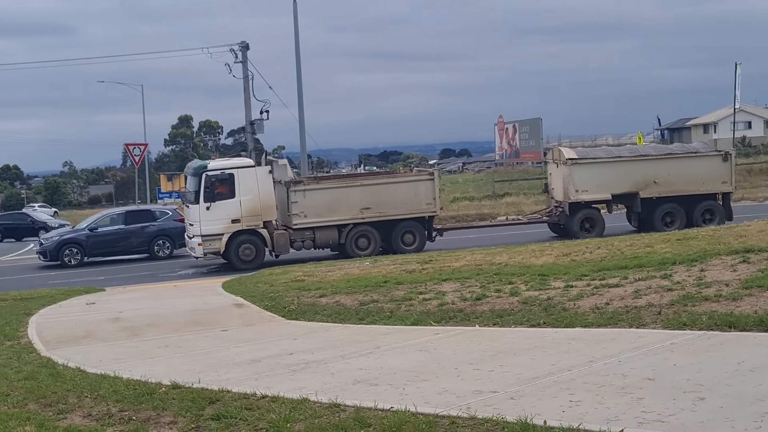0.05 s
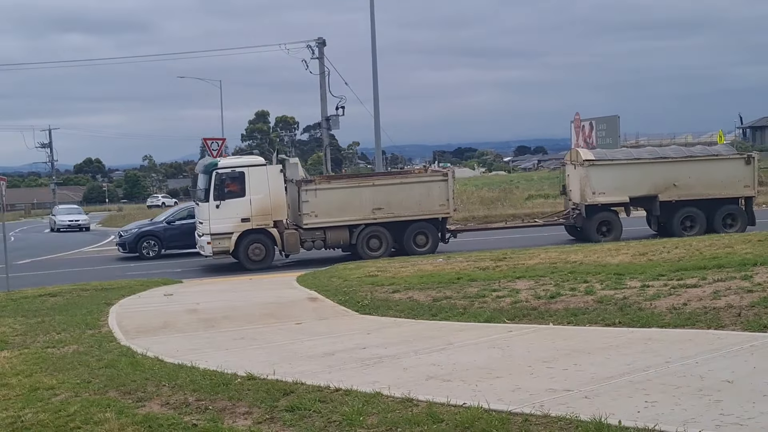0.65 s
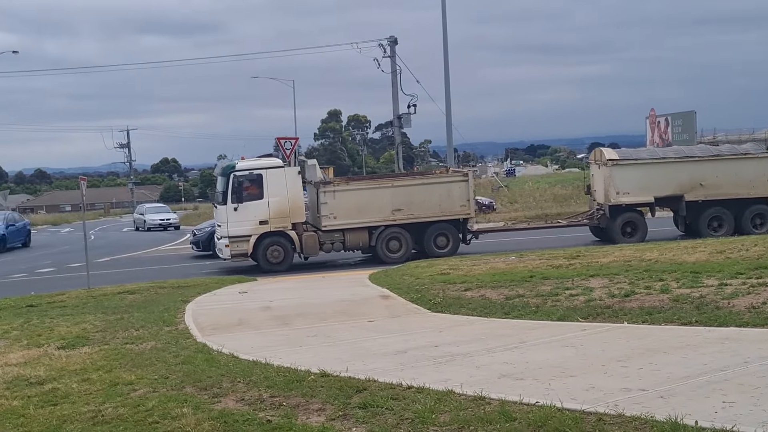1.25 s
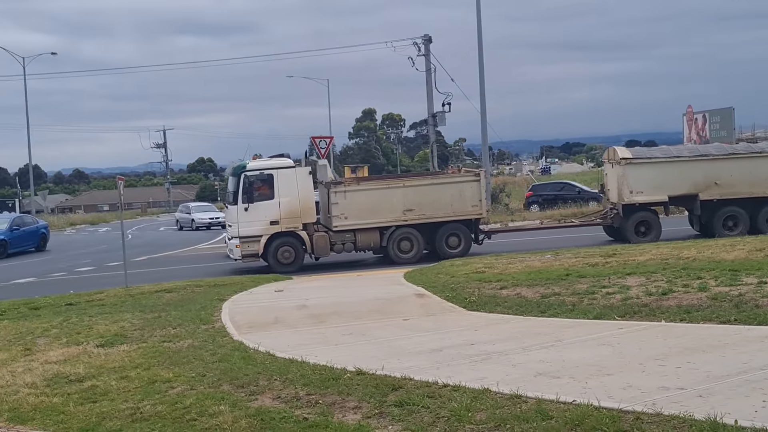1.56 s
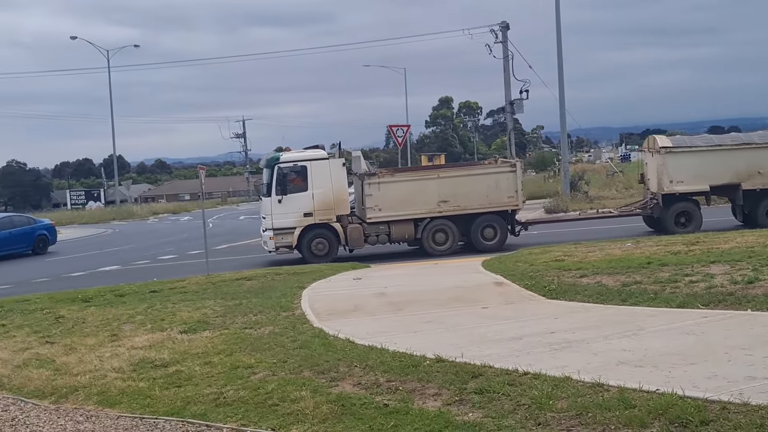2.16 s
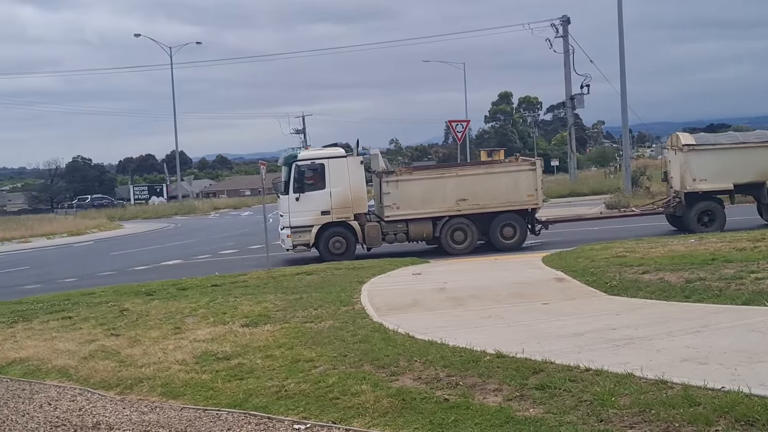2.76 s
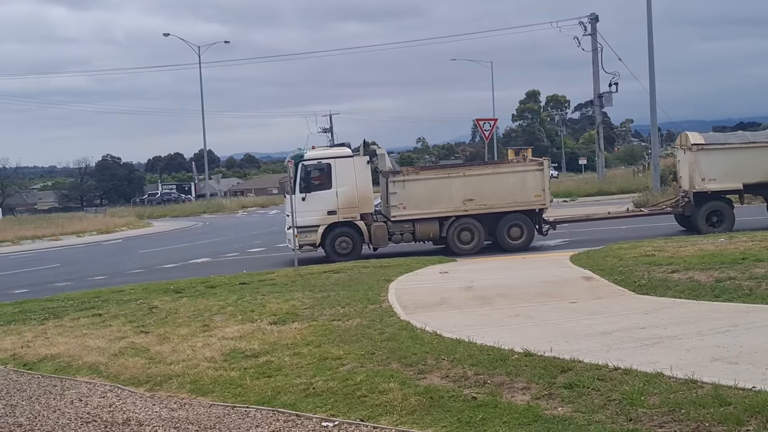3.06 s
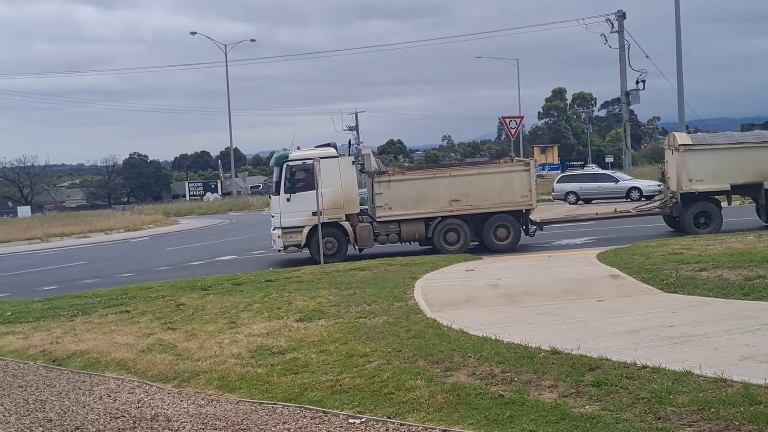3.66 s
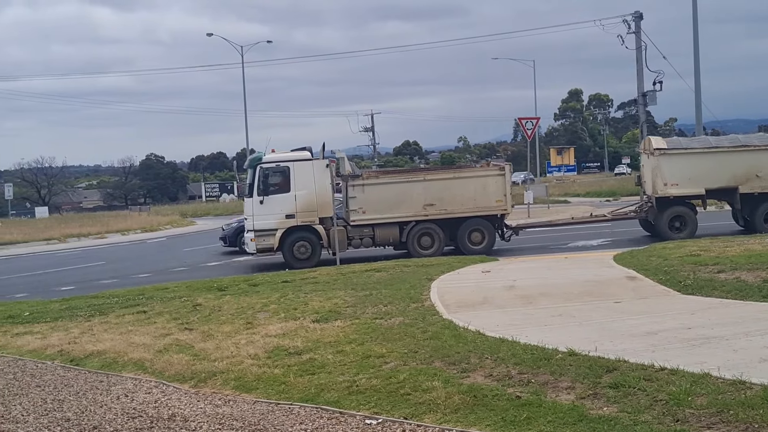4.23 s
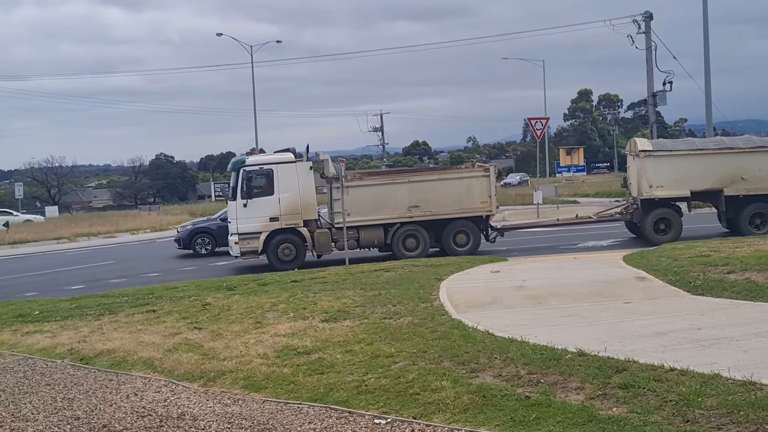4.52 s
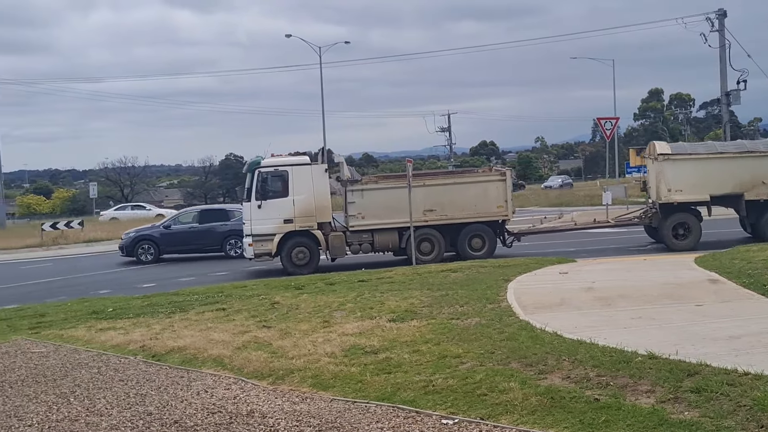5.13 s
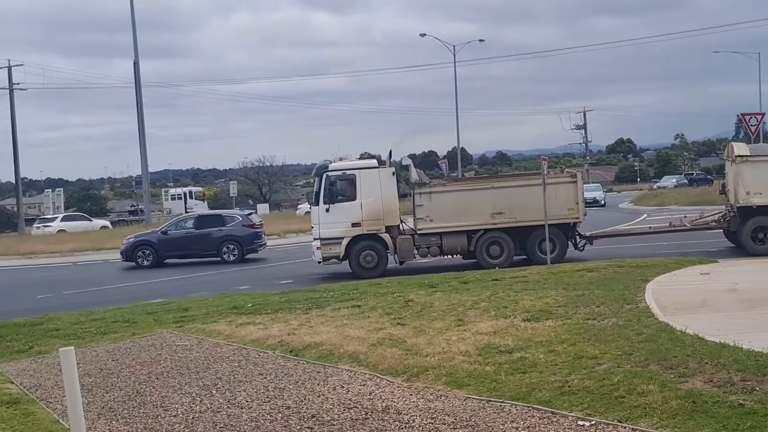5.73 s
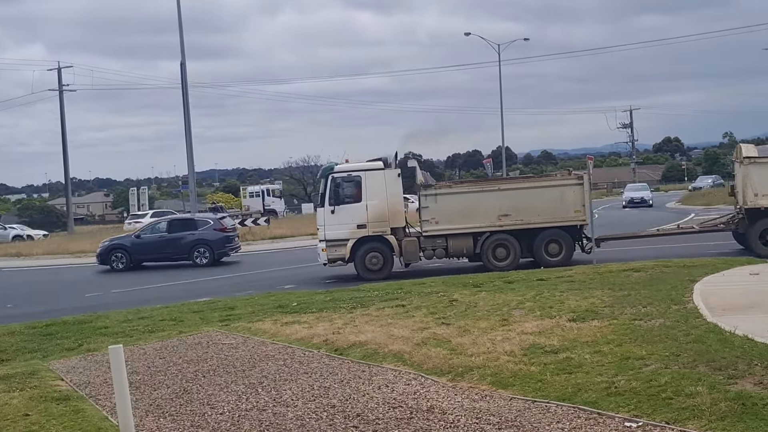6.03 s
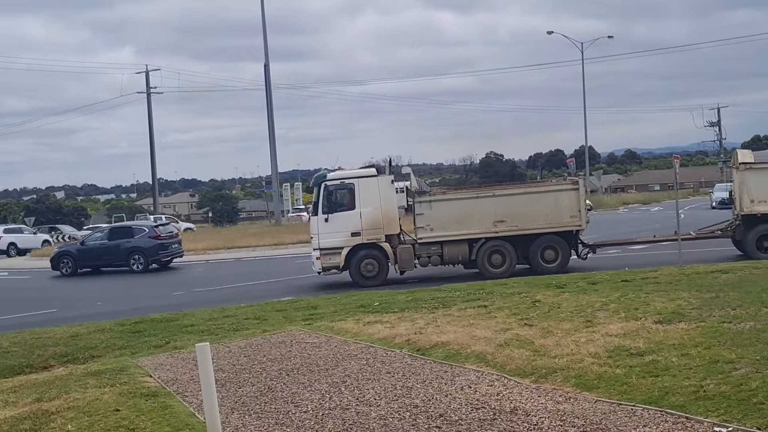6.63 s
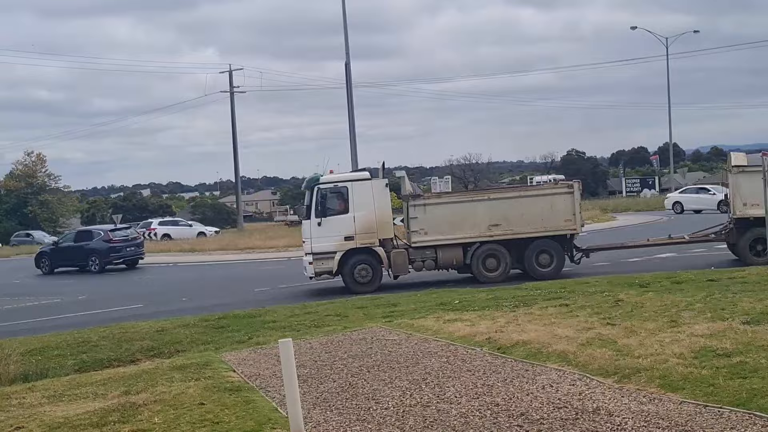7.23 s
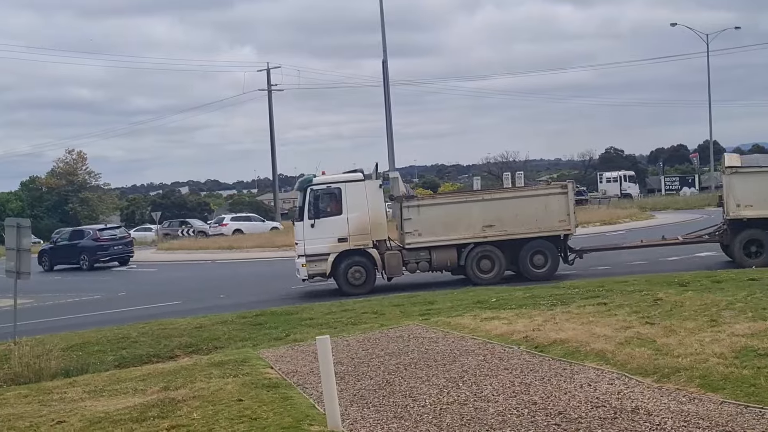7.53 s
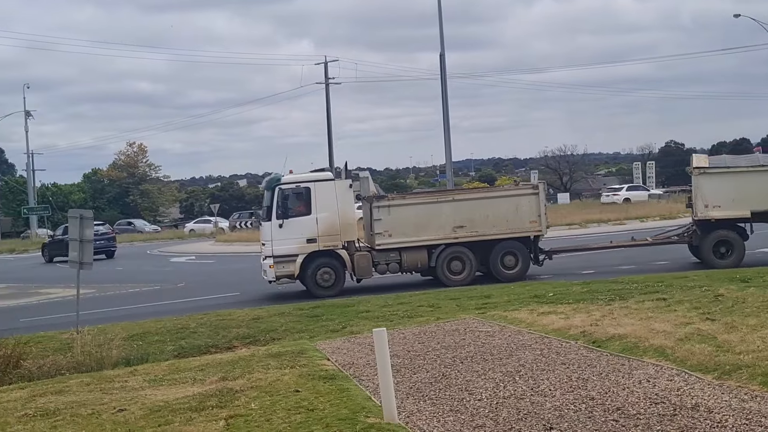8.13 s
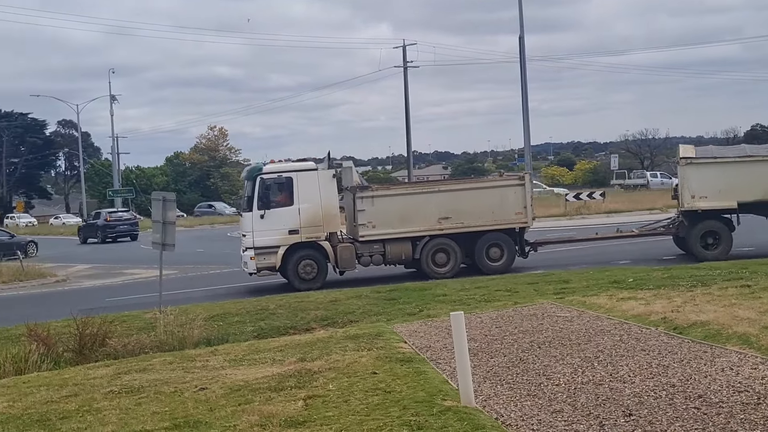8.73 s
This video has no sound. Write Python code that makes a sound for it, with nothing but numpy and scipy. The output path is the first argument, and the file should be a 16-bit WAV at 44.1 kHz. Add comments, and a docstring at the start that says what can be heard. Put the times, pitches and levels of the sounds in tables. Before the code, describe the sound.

Faint brake squeals and dull thumps come from a slow diesel tipper truck, which then accelerates with a deep, booming exhaust amid rumbling traffic.

```python
"""A six-cylinder diesel tipper with a trailer creeps up to a roundabout, blips the throttle, pulls away.
Its exhaust booms once per firing, while block clatter and rushing air grow with the load.
As it creeps, the brakes hiss and squeal faintly and dull jolts boom in the steel body.
Tyres rumble all around, another engine fades out at the start, and the right microphone port is muffled."""
import sys
import numpy as np
from scipy.fft import rfft, irfft, next_fast_len
from scipy.io import wavfile
from scipy.ndimage import uniform_filter1d, minimum_filter1d, map_coordinates

SR = 44100
rng = np.random.default_rng(int(sys.argv[2]) if len(sys.argv) > 2 else 0)


def dump_mix(stems):
    """Bounce the given channels to the path in sys.argv[1] as a 16-bit WAV at rate SR."""
    frames = np.atleast_2d(stems).T  # one column per channel
    limited = np.clip(frames, -1, 1)  # hard clip at full scale
    pcm = np.round(limited * 32767).astype(np.int16)
    wavfile.write(sys.argv[1], SR, pcm)


N = 396018
IDLE_HZ = 34.8  # firings per second at rest


def amp(db):
    """Decibels to gain."""
    return 10 ** (np.asarray(db) / 20)


def unit(x):
    """Scale to rms 1."""
    return x / np.sqrt(np.mean(x ** 2) + 1e-20)


def along(points, hz):
    """Read (freq_hz, value) points on a log frequency axis."""
    f, v = np.transpose(points)
    return np.interp(np.log(hz + 1), np.log(f + 1), v)


def curve(points):
    """An automation line through (time_s, value) points."""
    return np.interp(np.arange(N) / SR, *np.transpose(points))


def swell(start, end, rise, fall):
    """Rise, hold and fall between two times, 0-1."""
    t = np.arange(N) / SR
    return np.clip(np.minimum((t - start) / rise, (end - t) / fall), 0, 1)


def wobble(rate):
    """A smooth random curve, rate knots a second."""
    return map_coordinates(rng.standard_normal(int(N * rate / SR) + 4), [np.arange(N) * rate / SR])


def noise():
    """Fresh white noise."""
    return rng.standard_normal(N)


def filtered(x, response):
    """x through a complex frequency response."""
    m = next_fast_len(N + SR // 2)
    return irfft(rfft(x, m) * response(np.fft.rfftfreq(m, 1 / SR)), m)[..., :N]


def coloured(x, spectrum):
    """x through an EQ curve, at rms 1."""
    return unit(filtered(x, lambda hz: amp(along(spectrum, hz))))


def ringing(x, modes, drift):
    """x through steep resonances, at rms 1; drift scales their pitch."""
    def power(f):
        return sum(amp(2 * db) / (1 + ((f - hz) / (width / 2)) ** 2) ** 2 for hz, width, db in modes)
    now, warped = np.arange(N), np.cumsum(drift)
    # warp time, filter, warp back: the resonances bend while the rhythm stays put
    stretched = map_coordinates(x, [np.interp(now, warped, now)])
    ring = filtered(stretched, lambda f: np.sqrt(power(f)))
    return unit(map_coordinates(ring, [warped], mode="mirror"))


def bursts(firings, sharpness, uneven_db, scatter_db):
    """One swell per firing; each of the six cylinders has its own strength."""
    which = np.floor(firings).astype(int)
    cylinder_db = uneven_db * unit(rng.standard_normal(size=6))[which % 6]
    stroke_db = scatter_db * rng.standard_normal(size=2000)[which % 2000]
    return unit(amp(cylinder_db + stroke_db) * np.exp(-sharpness * np.cos(2 * np.pi * firings)))


def throttle(rate):
    """Air and knock grow with the revs and surge with each press: extra boom, air and knock, in dB."""
    # pedal presses: start_s, end_s, turbo_spool_s, rush_db, knock_db, extra_boom_db
    presses = [(3.295, 3.616, .1, -43.5, -46.5, 2.5), (3.857, 4.523, 0.15, -36, -37, 1.5),
               (4.995, 6.0, 0.75, -32, -35, 4.5), (6.156, 6.79, .21, -36.5, -39, 1.5),
               (7.925, 8.66, 0.32, -38, -33.5, 3), (8.491, 9.3, 0.17, -29.5, -31, 2)]
    pedal_s, release_s = 0.15, 0.15
    lunge_s = 1  # the extra boom fades as the truck picks up speed
    sag_db_per_s = 10.5  # rush and knock ease off once the turbo has spooled up
    t = np.arange(N) / SR
    push_db = np.zeros(N)
    rush = amp(-47.5 + 0.1612 * (rate - IDLE_HZ))
    knock = amp(-49 + 0.1163 * (rate - IDLE_HZ))
    for start, end, spool, rush_db, knock_db, boom_db in presses:
        lunge = np.exp(-np.maximum(t - start, 0) / lunge_s)
        push_db += boom_db * swell(start, end, pedal_s, release_s) * lunge
        sag = amp(-sag_db_per_s * np.maximum(t - start - spool, 0))
        surge = swell(start, end, spool, release_s) * sag
        rush = np.hypot(rush, amp(rush_db) * surge)
        knock = np.hypot(knock, amp(knock_db) * surge)
    return push_db, 20 * np.log10(rush), 20 * np.log10(knock)


def gearbox(push_db):
    """A gear loads the engine and the exhaust pulses harder: clutch 0-1, fundamental and upper dB."""
    # spells in gear: start_s, end_s, take_up_s, let_go_s, upper_harmonics_db
    gears = [(3.292, 3.655, 0.093, 0.033, -5.5), (3.747, 6.912, 0.13, 0.27, -0.5),
             (6.883, 9.3, .26, .2, -10.5)]
    clutch, upper = np.zeros(N), np.zeros(N)
    for start, end, take_up, let_go, upper_db in gears:
        grip = swell(start, end, take_up, let_go)
        clutch = np.maximum(clutch, grip)
        upper += amp(upper_db) * grip
    level = lambda load, idle_db: 20 * np.log10(np.hypot(load, amp(idle_db))) + push_db
    return clutch, level(clutch, idle_db=-21), level(upper, idle_db=-16.5)


def exhaust(firings, rate, first_db, upper_db, knock_db):
    """Each firing sends a pulse and a puff of gas down the pipe: boom, overtones and chug."""
    # tailpipe response that the first two harmonics sweep through: freq_hz, gain_db
    tailpipe = [(38, -16.5), (48, -11.5), (55, -14.5), (65, -8), (73, -11.5), (84, -9), (104, -12.5),
                (111, -15), (120, -25.5), (138, -30.5), (150, -19.5), (168, -17.5), (205, -27)]
    # harmonics 3 to 8 of the firing rate: gain_db
    overtone_db = [0.5, -1, -4.5, -15, -3.5, -10]
    # the silencer's colour on those overtones: freq_hz, gain_db
    silencer = [(120, -2), (172, 16), (220, -11), (290, 1.5), (420, -1), (500, 0), (600, -28)]
    # the pipe's colour on the chug: freq_hz, gain_db
    pipe = [(20, -19), (40, 13), (80, 7), (170, 10.5), (250, 5), (400, -10), (600, -20.5), (1500, -65)]
    # fader ride on the exhaust's turbulence: time_s, gain_db
    rumble = [(0, -40.5), (3.7, -44.5), (4.1, -38.5), (6.5, -40), (7.7, -41.5), (8.98, -46.5)]
    turn = 2 * np.pi * firings
    partial = lambda order: np.sin(order * turn + rng.uniform(0, 2 * np.pi))
    first = amp(first_db + along(tailpipe, rate) + 0.57 * wobble(10)) * np.sin(turn)
    second = amp(upper_db + along(tailpipe, 2 * rate) + 2.1 * wobble(16)) * np.cos(2 * turn)
    # load and hard combustion sharpen the pulses
    edge = np.hypot(amp(upper_db - 46), amp(knock_db - 10.5))
    overtones = sum(amp(db + along(silencer, k * rate) + 3 * wobble(24)) * partial(k)
                    for k, db in enumerate(overtone_db, start=3))
    # unequal cylinders add partials at sixths of the firing rate, and make the puffs chug
    sixth = lambda k: amp(along(pipe, k * rate / 6) + 2 * wobble(3)) * partial(k / 6)
    lope = unit(1.2 * sixth(3) + sum(sixth(k) for k in (5, 7, 8, 9, 10, 11)))
    gas = coloured(noise() * bursts(firings, sharpness=0.55, uneven_db=2, scatter_db=0.5), pipe)
    chug = amp(curve(rumble)) * (amp(9) * lope + amp(7.5) * gas)
    return first + second + edge * overtones + chug


def clatter(firings, knock_db, drift):
    """Combustion knocks ring the block; they stand out as the engine takes up the load."""
    # resonances of block and gearbox: pitch_hz, width_hz, gain_db
    block = [(803, 250, 0.5), (1080, 430, -1), (1398, 43, 3.5), (1547, 110, 0), (1973, 280, 3.5),
             (2275, 230, -2.5), (2776, 204, -0.5), (3033, 186, -0.5)]
    knocks = noise() * bursts(firings, sharpness=0.13, uneven_db=-0.8, scatter_db=1.0)
    return amp(knock_db) * ringing(knocks, block, drift)


def air(firings, rate, air_db, clutch, drift):
    """Mostly fan rush at idle; in gear the ducts howl, and their fizz grows with the revs."""
    # resonances of the intake and turbo ducts: pitch_hz, width_hz, gain_db
    ducts = [(3755, 600, 1), (3995, 113, 2), (4533, 390, 0.5), (4805, 99, 2), (5415, 490, -2.5),
             (5955, 135, -3.5), (6595, 590, -3.5), (7230, 225, -0.5), (7620, 410, -4.5), (8140, 550, -8)]
    # colour of the fan rush: freq_hz, gain_db
    fan_eq = [(700, -7.5), (2500, -6), (4300, 1), (5800, -7.5), (7200, -2), (8200, -8.5), (9000, -32.5)]
    # colour of the air's top hiss: freq_hz, gain_db
    fizz_eq = [(7000, -33), (9000, -2.5), (10300, -2.5), (11800, 2), (15500, -3.5)]
    rush = noise() * bursts(firings, sharpness=0.088, uneven_db=0.45, scatter_db=.5)
    boost = np.clip(clutch, 0.44, 1)  # some air rings the ducts even out of gear
    howl = boost * ringing(rush, ducts, drift)
    fan = np.sqrt(1 - boost ** 2) * coloured(noise(), fan_eq)
    fizz = amp(-19 + 0.044 * (rate - IDLE_HZ)) * coloured(rush, fizz_eq)
    return amp(air_db + 0.62 * wobble(8.3)) * (howl + fan + fizz)


def tyres():
    """Traffic rolling on the roundabout lays down a low, wavering bed."""
    # fader ride on the traffic: time_s, level_db
    ride = [(1.0, -30), (1.8, -32.5), (4.5, -31), (6.4, -30), (7.4, -36)]
    # colour of tyres on the road: freq_hz, gain_db
    road_eq = [(25, -16), (45, 8.5), (85, 21.5), (130, 10.5), (250, 1.5), (520, -6.5), (800, -1),
               (1400, -4), (2500, -10), (5000, -17), (8000, -28), (9000, -40)]
    return amp(curve(ride) + 0.69 * wobble(9.8)) * coloured(noise(), road_eq)


def other_engine():
    """Another engine drones on three harmonics and is gone within the first second."""
    # the drone's envelope: start_s, end_s, rise_s, fall_s, gain_db
    envelope = (0.6, 10.5, -0.8, 5.5, -28)
    start, end, rise, fall, db = envelope
    fade = swell(start, end, rise, fall)  # the negative rise fades it out, silent from start_s on
    turn = 2 * np.pi * np.cumsum(42 + 0.2 * wobble(3.99)) / SR
    drone = np.sin(2 * turn) + .35 * np.sin(turn) + .3 * np.sin(3 * turn)
    return amp(db + 2.2 * wobble(4.46)) * fade * drone


def brake_squeal():
    """Rubbing brakes sing in rough bands of noise: a broad drag, narrow whistles and scrapes."""
    # rubs: start_s, length_s, pitch_hz, width_hz, level_db
    squeals = [(-.1, 4, 3333, 4630, -46), (0, 1.2, 4230, 180, -48), (0.035, 0.44, 7200, 1200, -41.5),
               (0.841, 0.13, 10500, 200, -56), (0.924, .22, 6200, 110, -49.5), (1.19, .12, 1960, 231, -43),
               (2.13, 0.69, 1410, 110, -50), (2.81, .42, 1300, 151.2, -48)]
    out = np.zeros(N)
    for start, length, hz, width, db in squeals:
        rub = swell(start, start + length, rise=.05, fall=0.74 * length)
        band = filtered(noise(), lambda f: 1 / (1 + (2 * (f - hz) / width) ** 2))
        out += amp(db) * rub * unit(band)
    return out


def brake_hiss():
    """The brakes give short, dry, grainy hisses while the truck creeps."""
    # hisses: start_s, level_db, decay_s
    hisses = [(0.066, -42, 0.13), (0.86, -48.5, 0.25), (1.234, -50, 0.079), (1.63, -51, .12),
              (2.117, -48, .04), (2.467, -48.5, 0.19), (2.722, -47.5, 0.16), (3.134, -46, 0.043)]
    # their bright colour: freq_hz, gain_db
    hiss_eq = [(3000, -8), (6000, 7), (8200, 5.5), (9000, -9), (12000, -1.5), (15500, -12)]
    t = np.arange(N) / SR
    puffs = np.zeros(N)
    for start, db, decay in hisses:
        age = np.maximum(t - start, 0)
        puffs += amp(db) * (1 - np.exp(-age / .008)) * np.exp(-(age / decay) ** 2)
    return puffs * coloured(noise() * amp(1.3 * wobble(300)), hiss_eq)


def jolts(body_hz, rise_s):
    """Each jolt sets the rolling tipper's steel body booming for a few cycles."""
    # dull thumps: start_s, peak_db
    thumps = [(0.079, -16), (.47, -13.5), (.7, -16), (0.91, -21), (1.332, -22.5)]
    t = np.arange(SR // 4) / SR
    envelope = t / rise_s * np.exp(1 - t / rise_s)
    out = np.zeros(N + SR)
    for start, db in thumps:
        ring = np.sin(2 * np.pi * body_hz * (1 + 0.12 * rng.standard_normal()) * t)
        out[round(start * SR):][:len(t)] += amp(db) * envelope * ring
    return out[:N]


def scene():
    """The crankshaft times every part of the engine; both ports hear nearly the same sound."""
    # engine speed: time_s, firing_hz
    revs = [(0.0, 35.5), (0.14, 40.4), (0.61, 39.8), (1.86, 30.5), (3.1, 34.2), (3.3, 31.6), (3.55, 40),
            (3.78, 38), (4.09, 58.6), (4.43, 60.8), (4.7, 56.3), (4.95, 59.6), (5.12, 64), (5.47, 69),
            (6.25, 93.4), (6.59, 104), (7.03, 91), (7.65, 74.3), (7.99, 70.5), (8.3, 71.0), (8.44, 70.7),
            (8.88, 76.3)]
    # the engine's resonances shift as the truck turns past: time_s, pitch_ratio
    aspect = [(4.5, .978), (5.5, 1)]
    rate, drift = curve(revs), curve(aspect)
    push_db, air_db, knock_db = throttle(rate)
    clutch, first_db, upper_db = gearbox(push_db)
    firings = np.cumsum(rate * (1 + 0.0017 * wobble(20))) / SR
    boom = exhaust(firings, rate, first_db, upper_db, knock_db)
    engine = boom + clatter(firings, knock_db, drift) + air(firings, rate, air_db, clutch, drift)
    truck = engine + brake_squeal() + brake_hiss() + jolts(body_hz=78.5, rise_s=0.01)
    mix = truck + tyres() + other_engine()
    # diffuse road noise, on the right port only
    stray = amp(-31) * coloured(noise(), [(200, -16), (1000, 5), (8000, -3), (9500, -20)])
    return np.array([mix, mix + stray])


def record(dry):
    """The muffled right port is dull and late; a limiter holds the boom under full scale."""
    # the right port against the left: freq_hz, gain_db
    muffle = [(60, -4.5), (110, -9.5), (200, -12.5), (380, -17), (700, -29.5), (1290, -37), (2380, -49.5),
              (4400, -68), (8000, -66), (10000, -47), (15000, -41)]
    lag = [(30, 0.4), (70, 1.0), (300, 0.93), (1000, 0.13)]  # freq_hz, phase_rad
    delay_s, ceiling, top_hz = 0.00058, .92, 15720

    def ports(hz):
        right = amp(along(muffle, hz)) * np.exp(-1j * (along(lag, hz) + 2 * np.pi * hz * delay_s))
        return np.array([np.ones_like(hz), right]) * 2 / np.abs(1 + right)  # the mono sum stays flat
    pair = filtered(dry, ports)
    needed = np.minimum(1, ceiling / (np.abs(pair).max(axis=0) + 1e-9))
    gain = uniform_filter1d(minimum_filter1d(needed, size=1400), size=1300)
    return filtered(pair * gain, lambda hz: hz < top_hz)


dry = scene()
out = record(dry)
dump_mix(out)
```